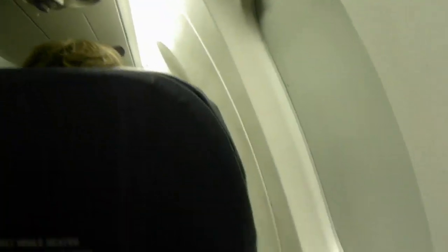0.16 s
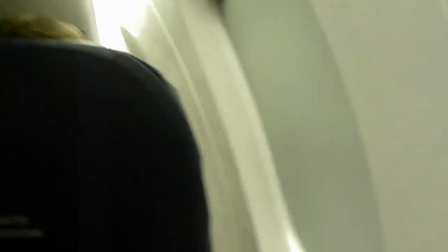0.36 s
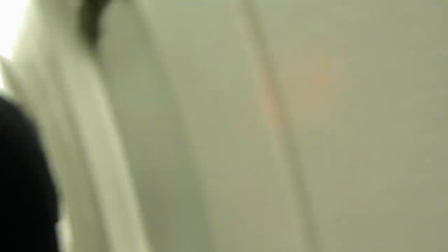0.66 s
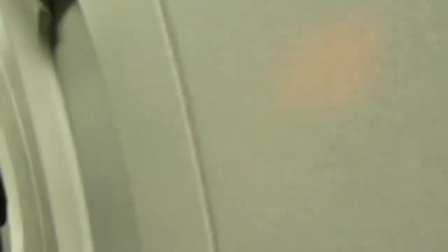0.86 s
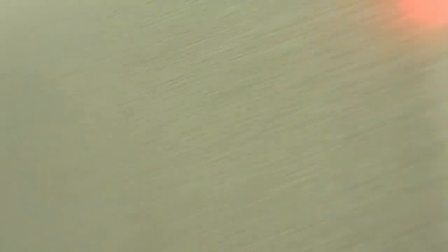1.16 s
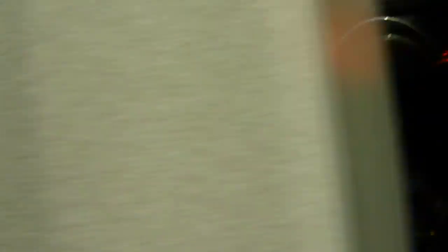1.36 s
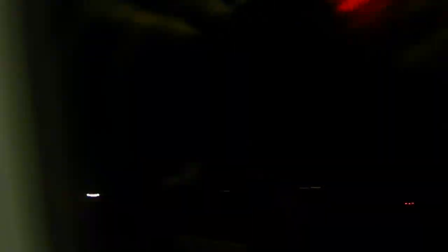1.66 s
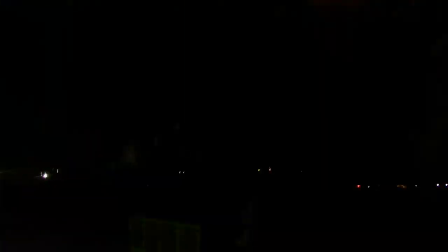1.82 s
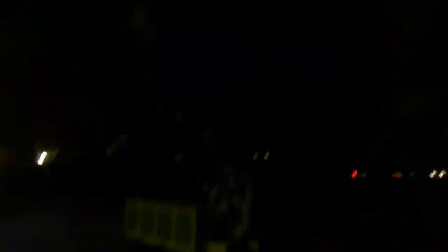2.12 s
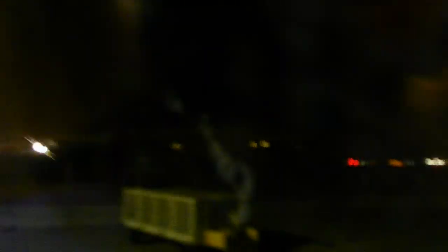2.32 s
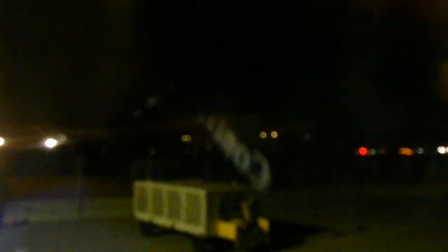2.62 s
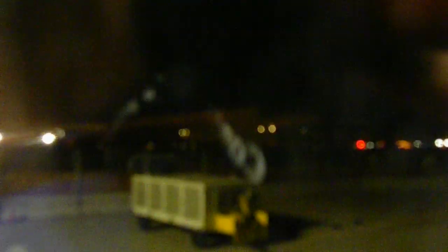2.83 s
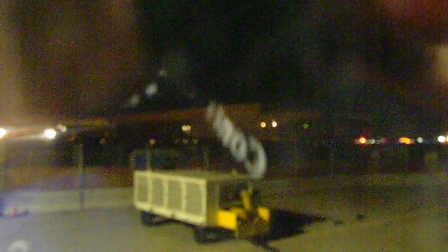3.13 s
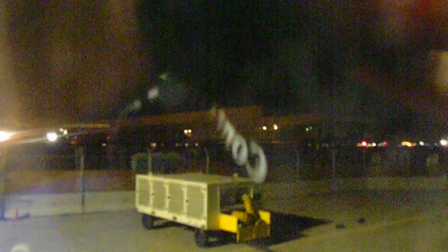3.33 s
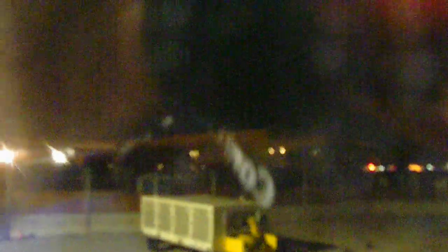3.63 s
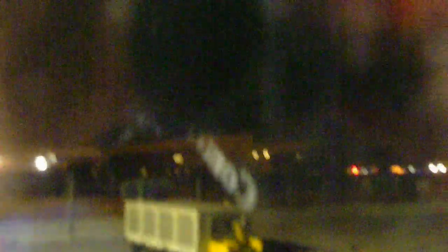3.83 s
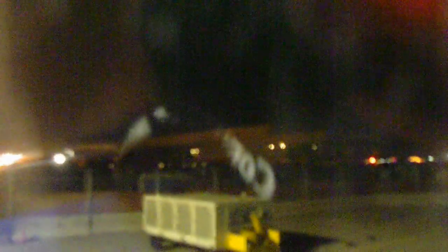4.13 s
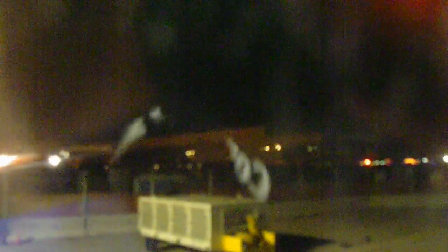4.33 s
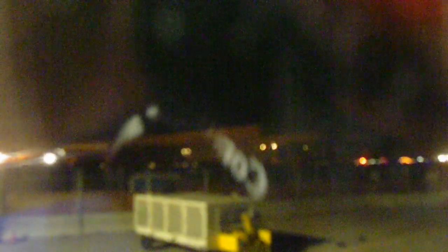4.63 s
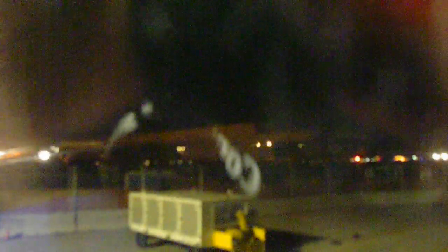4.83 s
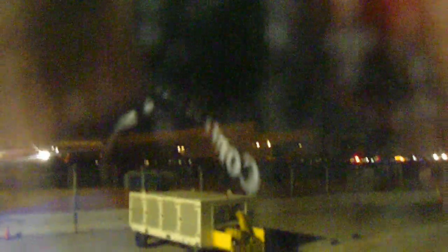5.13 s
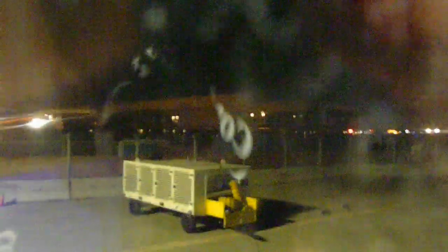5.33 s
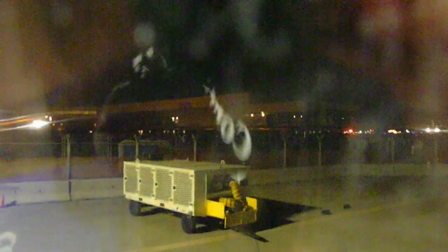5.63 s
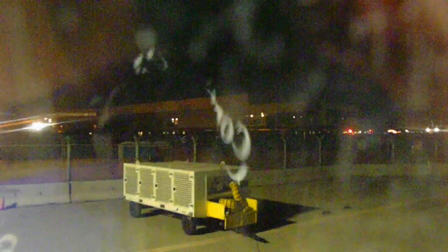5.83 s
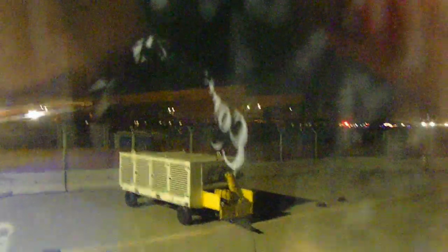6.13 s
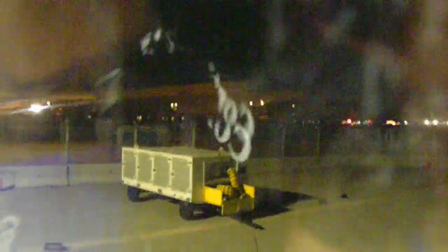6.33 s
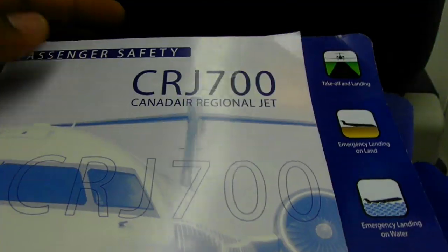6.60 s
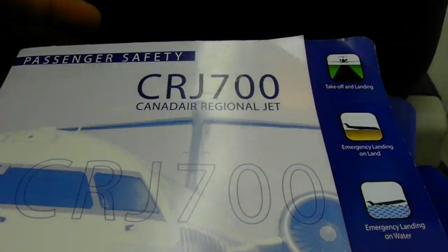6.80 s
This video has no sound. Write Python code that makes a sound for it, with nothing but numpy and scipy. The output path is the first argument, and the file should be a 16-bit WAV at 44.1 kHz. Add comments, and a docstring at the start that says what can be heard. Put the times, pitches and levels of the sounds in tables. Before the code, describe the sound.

Inside a parked airliner, air vents hiss steadily over a low duct rumble and faint fan hum. The hand-held camera's microphone moves from the seat into the window recess, making the hiss sweep and turn hollow. Small finger ticks and dull bumps come first, then a cluster of scrapes and squeaks on plastic trim, a sharp knock on the pane, and finally a tiny silence before the open cabin hiss returns.

```python
"""Window seat in a parked airliner

Air conditioning hisses as shaped noise, over a low duct rumble of filtered noise and faint, unsteady fan tones.
A hand-held camera moves from the seat into a window recess, whose resonances and echoes colour the hiss.
Impacts and tiny slips ring its housing, its grip, the trim and the pane; gliding tones squeak.
Its gain control ducks at loud sounds, and it pauses for an instant before it resumes back at the seat."""
import sys
import numpy as np
from scipy import signal
from scipy.fft import rfft, irfft, next_fast_len
from scipy.io import wavfile
from scipy.ndimage import uniform_filter1d, map_coordinates

SR = 44100
rng = np.random.default_rng(int(sys.argv[2]) if len(sys.argv) > 2 else 0)


def dump_mix(stems):
    """Bounce the given channels to the path in sys.argv[1] as a 16-bit WAV at rate SR."""
    frames = np.atleast_2d(stems).T  # one column per channel
    limited = np.clip(frames, -1, 1)  # hard clip at full scale
    pcm = np.round(limited * 32767).astype(np.int16)
    wavfile.write(sys.argv[1], SR, pcm)


N = 306936

# The microphone's path from the seat to the window and back. Each row: time in seconds, relative hiss
# level in dB, depth into the window recess (0-1), closeness to the pane (0-1).
MICROPHONE_PATH = [(0, -20, .02, 0.2), (.55, -20.5, 0.08, 0.16), (.85, -20, 0, 0.3), (.95, -22, 0.26, .12),
                   (1.35, -19.5, 0.26, .1), (1.85, -22, .72, 0.22), (2.6, -21, 0.94, 0.2),
                   (3.7, -19.5, 0.88, .2), (4.05, -20, 0.88, .42), (5.05, -18.5, 0.84, 0.46),
                   (5.25, -19, 0.91, .85), (6.55, -20.5, 0.83, 1), (6.63, -19, 0.04, .3)]


def amp(db):
    """Amplitude factor of a level in dB."""
    return 10 ** (np.asarray(db) / 20)


def unit(x):
    """x scaled to an RMS of 1."""
    return x / np.sqrt(np.mean(x ** 2) + 1e-20)


def along(points, hz):
    """(Hz, value) points, interpolated on a log frequency axis."""
    point_hz, values = np.transpose(points)
    return np.interp(np.log(hz + 1), np.log(point_hz + 1), values)


def curves(rows, t):
    """Each column after the time, read at times t."""
    times, *columns = np.transpose(rows)
    return [np.interp(t, times, column) for column in columns]


def wobble(rate):
    """A smooth random curve, rate knots a second."""
    knots = rng.standard_normal(int(N * rate / SR) + 4)
    return map_coordinates(knots, [np.arange(N) * rate / SR])


def filtered(x, response):
    """x passed through a response given as a function of frequency."""
    size = next_fast_len(N + SR // 2)
    spectrum = rfft(x, size) * response(np.fft.rfftfreq(size, 1 / SR))
    return irfft(spectrum, size)[..., :N]


def bell(hz, centre_hz, width):
    """A Gaussian bump of height 1 around a frequency; width is its standard deviation."""
    return np.exp(-.5 * ((hz - centre_hz) / width) ** 2)


def resonances(modes, hz):
    """dB gain of a set of peaks and hollows."""
    return sum(db * bell(hz, centre, width) for centre, width, db in modes)


def echo(hz, seat_ms, deep_ms, depth):
    """Response of a reflection whose delay shrinks as the microphone moves in."""
    delay_ms = seat_ms + (deep_ms - seat_ms) * depth
    return np.exp(-2j * np.pi * hz * delay_ms / 1000)


def gap_colour(hz, depth, close):
    """dB colour of the gap between camera and trim: closing changes its bands, pressing flattens its rings."""
    # Rings of the open gap. Each row: centre in Hz before flattening, width in Hz, gain in dB before scaling.
    gap_modes = [(5760, 330, 5), (9100, 540, 4)]
    # A lost band and gained bands as the gap closes. Each row: centre in Hz, width in Hz, full gain in dB.
    closing_modes = [(4400, 340, -5.5), (6170, 760, 2), (10600, 280, 0.5)]
    shut_from, shut_at = 0.32, .34  # closeness at which closing starts and is complete
    press_from, press_flattens = 0.75, .08  # closeness where the rings start to go flat; share at the pane
    seat_share, seat_flattens = 0.31, .06  # wide gap at the seat: strength and flattening of its rings
    treble_db, press_treble_db = -2.5, 3  # before the treble slope below; the second is gained at the pane

    shut = np.clip((close - shut_from) / (shut_at - shut_from), 0, 1)
    pressed = np.clip((close - press_from) / (1 - press_from), 0, 1)
    pitch_factor = 1 - seat_flattens * (1 - depth) - press_flattens * pressed
    rings_db = resonances(gap_modes, hz / pitch_factor)
    ring_share = seat_share + (1 - seat_share) * depth ** 4
    treble_slope = along([(9000, 0.13), (12000, 0.92)], hz)
    treble = (treble_db + press_treble_db * pressed) * treble_slope
    return ring_share * rings_db + depth * shut * resonances(closing_modes, hz) + treble


def passing_colour(hz, t):
    """dB colour that comes and goes: bands and a comb glide up at each trim edge, a short tube rings at the pane."""
    # The camera passes an edge of the trim. Each row: start in seconds, length in seconds,
    # start pitch in Hz, end pitch in Hz, ring strength in dB before the strands scale it.
    passes = [(0.63, 0.31, 5400, 9500, 0), (0.91, 0.94, 4380, 6400, 7.5), (1.61, .42, 8400, 9200, 4.5),
              (2.08, 0.33, 5300, 5900, 3), (2.0, .58, 12000, 16000, 5.5)]
    # Broad bands that glide together. Each row: pitch over the ring's, width over the ring's pitch,
    # strength relative to the ring.
    strands = [(.85, .04, 0.53), (1, 0.064, 0.98), (1.25, .06, -0.4), (1.85, 0.072, .35)]
    # The hollow, tube-like moment. Each row: centre in Hz, width in Hz, full gain in dB.
    tube_modes = [(1100, 110, 4), (2050, 180, 6), (3130, 180, 3.5)]
    tube_s, tube_rise_s, tube_fade_s = 5.18, 0.1, 0.44
    glide_power = 2.8  # above 1, the glide speeds up
    ripple_db, ripple_order = 1.2, 6.96  # comb depth; the ring sits near this tooth of the comb

    tube = np.interp(t - tube_s, [0, tube_rise_s, tube_rise_s + tube_fade_s], [0, 1, 0])
    colour_db = tube * resonances(tube_modes, hz)
    for start, length, start_hz, end_hz, db in passes:
        progress = np.clip((t - start) / length, 0, 1)
        ring_hz = start_hz + (end_hz - start_hz) * progress ** glide_power
        ratio = hz / ring_hz
        ripple = ripple_db * np.cos(2 * np.pi * ripple_order * ratio) * bell(ratio, 1, 0.44)
        presence = np.sqrt(abs(np.sin(np.pi * progress)))
        colour_db = colour_db + presence * (db * resonances(strands, ratio) + ripple)
    return colour_db


def vents(echo_share=0.13, standing_db=2.0, flutter_db=0.9):
    """Turbulent air hisses: noise coloured by the surfaces near the moving microphone."""
    # Air from the vents. Each row: frequency in Hz, relative level in dB.
    vent_colour = [(190, -29), (240, -18.5), (480, -4.5), (800, -9), (1200, -10.5), (1800, -4.5),
                   (2450, -2), (3400, -1.5), (4600, 0), (7200, 1.5), (8600, -1), (10000, -7),
                   (12000, -11.5), (15800, -15)]
    # What the recess adds when fully inside. Each row: frequency in Hz, gain in dB.
    recess_colour = [(200, 6), (300, 8.5), (500, -4), (780, 9.5), (1300, 7), (1520, 3), (2100, 0),
                     (2500, 2), (2900, 0.5), (3600, -5.5), (6600, -1.5), (8600, -1), (12500, -2.5),
                     (15000, -1)]
    # Peaks and hollows of the recess. Each row: centre in Hz, width in Hz, gain in dB before scaling.
    recess_modes = [(1000, 35, -1), (1530, 46, -4.5), (2529, 65, 7), (10000, 150, 3), (12500, 220, -3.5)]
    # The slot in front of the pane. Each row: centre in Hz, width in Hz, gain in dB at full closeness.
    pane_modes = [(417, 21, 4), (745, 260, -0.5), (2200, 96, 4), (5070, 55, -11), (5270, 150, 6.5),
                  (7630, 210, -9.5), (8690, 530, -9), (9840, 64, 7.5), (15200, 450, 1.5)]
    ring_open, ring_shut = 1.19, .95  # strength of the recess's peaks away from the pane and against it

    hz, t, noise = signal.stft(rng.standard_normal(N), SR, nperseg=2048)
    hz = hz[:, None]
    level_db, depth, close = curves(MICROPHONE_PATH, t)
    ringing = ring_open + (ring_shut - ring_open) * close
    colour_db = depth * (along(recess_colour, hz) + ringing * resonances(recess_modes, hz))
    colour_db += close * resonances(pane_modes, hz)
    colour_db += gap_colour(hz, depth, close) + passing_colour(hz, t)

    # echoes comb the hiss; the comb rises in pitch as the microphone moves in and weakens near the pane
    wall_echo = echo(hz, 0.837, .5, depth)
    recess_echo = echo(hz, 2.24, 1.493, depth)
    echoes = (1 - depth) * wall_echo + depth * recess_echo
    comb = 1 + echo_share * (1 - close / 2) * echoes

    # the cabin's standing waves leave narrow peaks and hollows that drift slowly
    across_pitch = uniform_filter1d(rng.standard_normal(noise.shape), size=3, axis=0)
    standing = unit(uniform_filter1d(across_pitch, size=35, axis=1))
    gain = unit(amp(along(vent_colour, hz))) * comb * amp(level_db + colour_db + standing_db * standing)
    hiss = signal.istft(noise * gain, SR, nperseg=2048)[1][:N]
    return hiss * amp(flutter_db * wobble(11))


def ducts(rumble_db=-47.5):
    """Air in the ducts rumbles: steady noise, mostly low."""
    # Rumble colour. Each row: frequency in Hz, relative level in dB.
    duct_colour = [(20, -31), (40, -28), (55, -7), (66, 0.5), (88, -0.5), (110, -1.5), (130, -2),
                   (155, -11), (190, -19.5), (300, -3.5), (600, -65)]
    rumble = unit(filtered(rng.standard_normal(N), lambda hz: amp(along(duct_colour, hz))))
    return amp(rumble_db) * rumble


def fans(fan_db=-5, pane_db=5, drift_hz=2.57, waver_db=2.0):
    """Fans hum as tones of unsteady pitch and level, stronger beside the pane."""
    # Fan tones. Each row: mean frequency in Hz, relative level in dB.
    fan_tones = [(86, -56), (312, -52.5), (383, -47), (1034, -50)]
    tones = np.zeros(N)
    for hz, db in fan_tones:
        level = amp(db + waver_db * wobble(2.6))
        pitch = hz + drift_hz * wobble(12)
        tones += level * np.sin(2 * np.pi * np.cumsum(pitch) / SR)
    close = curves(MICROPHONE_PATH, np.arange(N) / SR)[2]
    return amp(fan_db + pane_db * close) * np.sqrt(2) * tones


def body(spectrum, size=2048):
    """Causal, minimum-phase impulse response of energy 1 with the given colour."""
    log_gain = np.log(amp(along(spectrum, np.fft.rfftfreq(size, 1 / SR))))
    cepstrum = irfft(log_gain)
    cepstrum[1:size // 2] *= 2  # fold the cepstrum to make it causal
    cepstrum[size // 2 + 1:] = 0
    response = irfft(np.exp(rfft(cepstrum)))
    return response / np.linalg.norm(response)


def contacts(rows, spectrum, grainy_db, impact_db, rise_share, t60):
    """Each contact is an impact, a slide of tiny slips and a dying rattle, ringing one body; long ones swell."""
    soften_db = 5  # the impact weakens by this with each doubling of the sliding time
    longest_rise_s = 0.0066
    t = np.arange(SR // 2) / SR
    force = np.zeros(N + SR)
    slips = unit(rng.standard_normal(N) * amp(grainy_db * wobble(600)))
    for time, db, slide in rows:
        start = round(time * SR)
        rise = min(rise_share * slide, longest_rise_s)
        decay = amp(-60 * np.maximum(t - rise - slide, 0) / t60)
        swell = np.minimum(t / rise, 1) * decay
        force[start:start + len(t)] += amp(db) * swell * np.roll(slips, -start)[:len(t)]
        force[start] += amp(db + impact_db - soften_db * np.log2(slide / .001))
    return signal.fftconvolve(force, body(spectrum))[:N]


def ticks():
    """Fingers tick and brush on the camera housing, which rings bright and short."""
    # Each row: start in seconds, slip level in dB, sliding time in seconds.
    finger_contacts = [(.3418, -8, 0.00079), (.3992, -18, .001), (.632, -24, 0.018), (.9108, -12, 0.0008),
                       (1.020, -19, 0.0025), (1.253, -14, 0.0028), (1.732, -17.5, 0.021),
                       (2.083, -15, 0.0084), (3.47, -19, 0.028), (4.469, -21, .004), (5.879, -19, 0.0054)]
    # Each row: frequency in Hz, relative level in dB.
    housing_colour = [(800, -25), (2500, -8), (4200, 3.5), (6800, 8), (10800, -1), (15000, -10.5)]
    return contacts(finger_contacts, housing_colour, grainy_db=1.5, impact_db=9, rise_share=.25, t60=.008)


def bumps():
    """The grip bumps dully: soft contacts ring a body with little treble."""
    # Each row: start in seconds, slip level in dB, sliding time in seconds.
    grip_contacts = [(.797, -34, 0.0068), (1.092, -29, 0.0065), (1.755, -36, 0.0087),
                     (2.627, -29.5, 0.0049), (3.118, -31, 0.018), (5.178, -30.5, .05),
                     (6.062, -28.5, 0.0073), (6.435, -33.5, .009)]
    # Each row: frequency in Hz, relative level in dB.
    grip_colour = [(30, -41), (120, 3), (200, -12), (330, 5), (520, 5.5), (800, -6.5), (2000, -38),
                   (6000, -46)]
    return contacts(grip_contacts, grip_colour, grainy_db=3, impact_db=19, rise_share=0.85, t60=0.072)


def squeaks(rough=0.0288):
    """Rubbed plastic sings briefly on an uneven, gliding pitch."""
    # Each row: start in seconds, length in seconds, start pitch in Hz, end pitch in Hz, level in dB;
    # pitch and level waver around these.
    rubs = [(0.821, 0.069, 458, 527, -28.5), (3.623, 0.04, 1130, 980, -17), (3.711, 0.067, 1020, 1110, -16),
            (5.105, 0.046, 686, 616, -28.5)]
    t = np.arange(N) / SR
    unsteady = 1 + rough * wobble(160)
    strength = amp(2.5 * wobble(110))
    out = np.zeros(N)
    for start, length, start_hz, end_hz, db in rubs:
        progress = np.clip((t - start) / length, 0, 1)
        pitch = (start_hz + (end_hz - start_hz) * progress) * unsteady
        envelope = np.sqrt(abs(np.sin(np.pi * progress)))
        out += amp(db) * envelope * np.sin(2 * np.pi * np.cumsum(pitch) / SR)
    return out * strength


def scrapes():
    """The camera body scrapes on the window trim: grainy slips ring its midrange."""
    # Each row: start in seconds, slip level in dB, sliding time in seconds.
    trim_contacts = [(3.274, -17.5, 0.018), (3.4412, -14.5, 0.0071), (3.461, -20, 0.016),
                     (3.489, -18, 0.015), (3.622, -16.5, 0.0098), (3.636, -13.5, 0.018),
                     (3.659, -17.5, 0.049), (3.716, -21, 0.062), (3.843, -22, 0.0066), (3.877, -23, 0.012),
                     (3.886, -22, 0.037), (3.929, -31, .006), (3.946, -25, .015)]
    # Each row: frequency in Hz, relative level in dB.
    trim_colour = [(150, -31), (350, -9), (500, -10), (680, -3.5), (930, -1), (1080, 2.5), (1230, -2.5),
                   (1700, -2.5), (2200, -8.5), (3200, -12.5), (6000, -17.5), (12000, -58)]
    return contacts(trim_contacts, trim_colour, grainy_db=3, impact_db=25, rise_share=.25, t60=.08)


def knocks():
    """A hard knock on the pane and its rebound: strong impacts ring the pane."""
    # Each row: start in seconds, slip level in dB, sliding time in seconds.
    pane_contacts = [(4.8372, -11.5, .004), (4.8405, -16, .022)]
    # Each row: frequency in Hz, relative level in dB.
    pane_colour = [(150, -23), (450, -7), (900, -1), (1450, 2.5), (2200, 1.5), (2900, 0.5), (4200, -3),
                   (5500, -11), (12000, -29)]
    return contacts(pane_contacts, pane_colour, grainy_db=1.5, impact_db=30, rise_share=.05, t60=.05)


def scene():
    """One microphone, the same in both channels."""
    cabin = vents() + ducts() + fans()
    handling = ticks() + bumps() + squeaks() + scrapes() + knocks()
    mono = cabin + handling
    return np.array([mono, mono])


def gain_control(x, threshold_db=-15, recovery_s=0.14, attack_s=0.0051):
    """The gain drops quickly when the level passes the threshold, then eases back."""
    power = abs(uniform_filter1d(x[0] ** 2, size=128))
    excess_db = np.maximum(10 * np.log10(power + 1e-12) - threshold_db, 0)
    fading = np.exp(-np.arange(N) / SR / recovery_s)
    held_db = np.maximum.accumulate(excess_db / fading) * fading  # peaks held, decaying exponentially
    pole = np.exp(-1 / (attack_s * SR))
    reduction_db = signal.lfilter([1 - pole], [1, -pole], held_db)
    return x * amp(-reduction_db)


def record(dry, notch_hz=7880, notch_width_hz=300, ceiling=.72, top_hz=15800):
    """The camera: a narrow notch, soft overload, gain control, a short pause and its band limit."""
    pause_start_s, pause_end_s = 6.56, 6.6288
    notched = filtered(dry, lambda hz: 1 - .96 / (1 + 1j * (hz - notch_hz) / notch_width_hz))
    overloaded = notched / (1 + (notched / ceiling) ** 6) ** (1 / 6)
    t = np.arange(N) / SR
    running = (t < pause_start_s) | (t > pause_end_s)
    return filtered(gain_control(overloaded) * running, lambda hz: hz < top_hz)


dry = scene()
out = record(dry)
dump_mix(out)
```